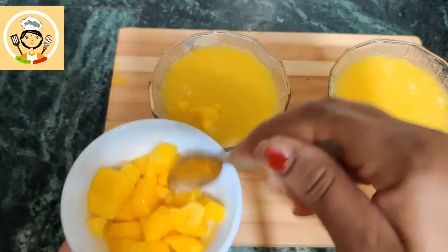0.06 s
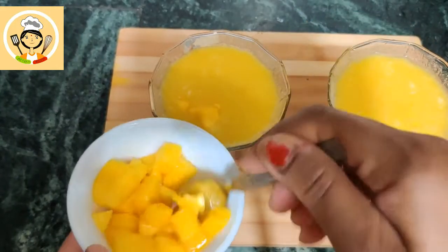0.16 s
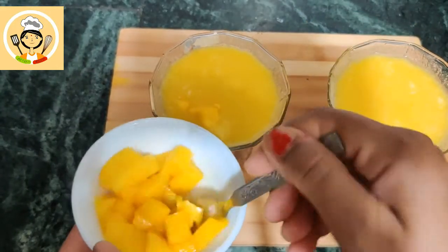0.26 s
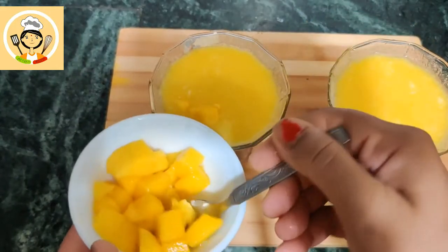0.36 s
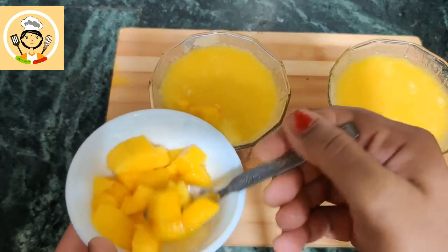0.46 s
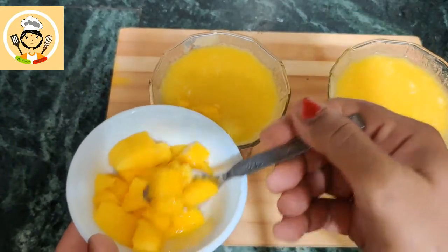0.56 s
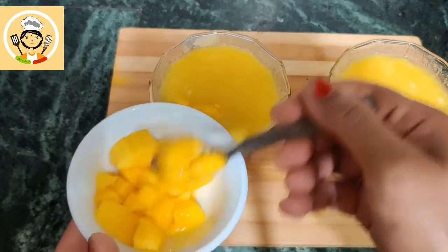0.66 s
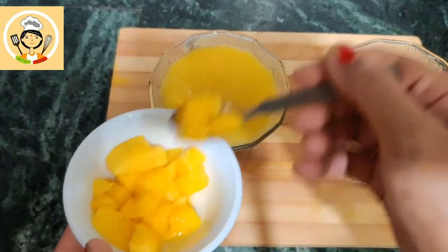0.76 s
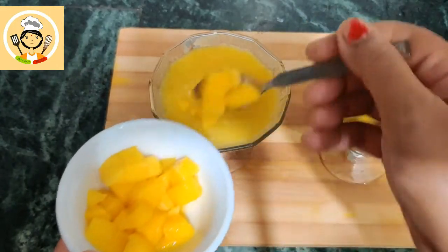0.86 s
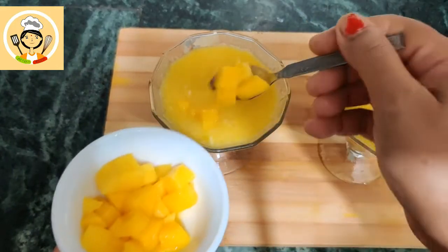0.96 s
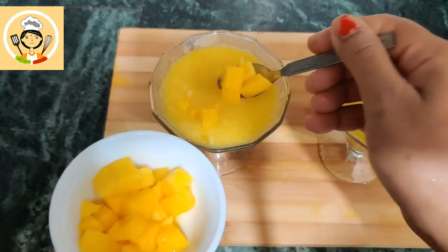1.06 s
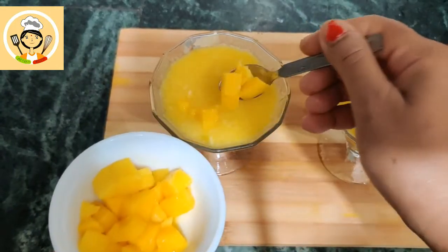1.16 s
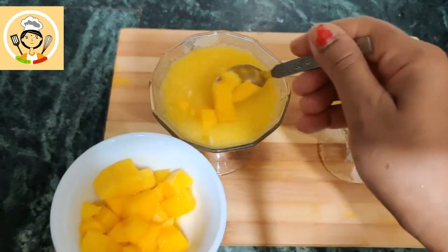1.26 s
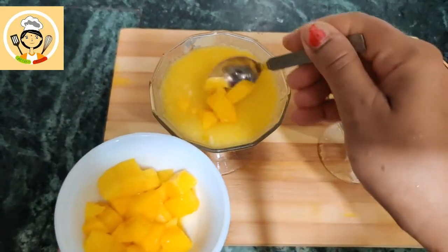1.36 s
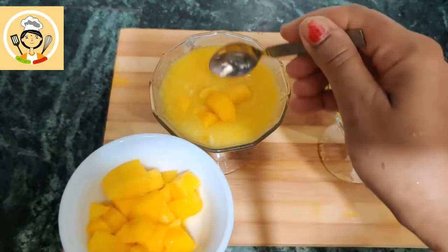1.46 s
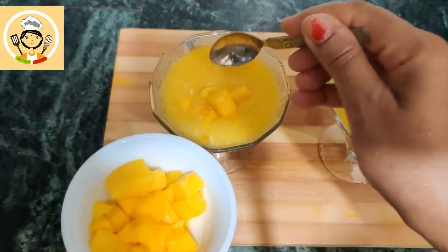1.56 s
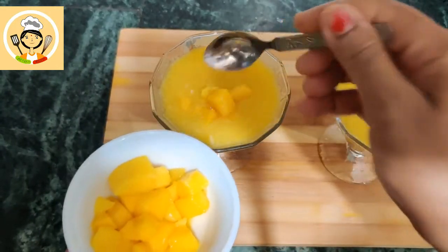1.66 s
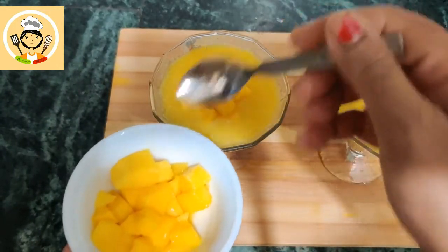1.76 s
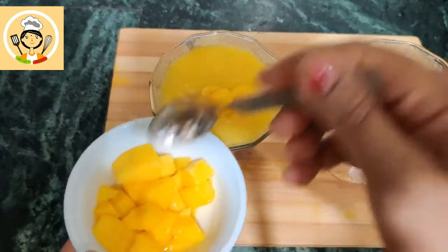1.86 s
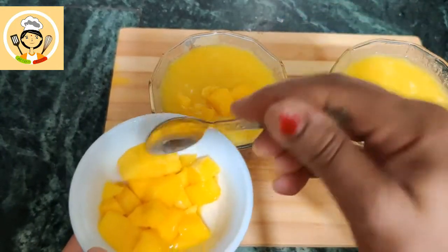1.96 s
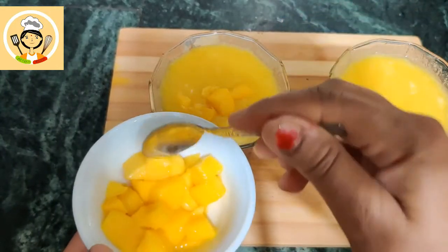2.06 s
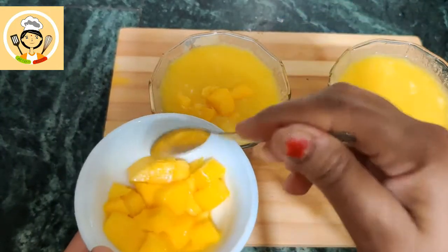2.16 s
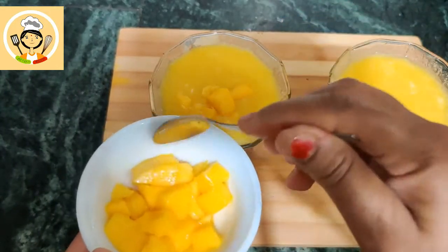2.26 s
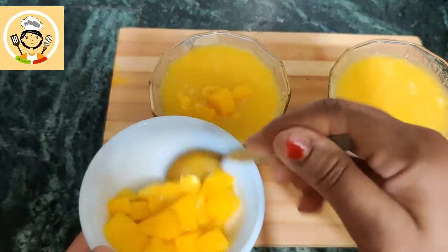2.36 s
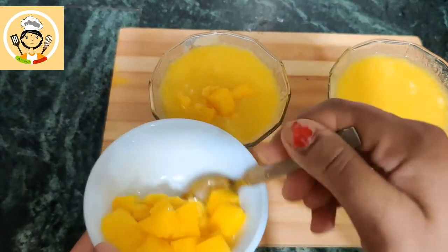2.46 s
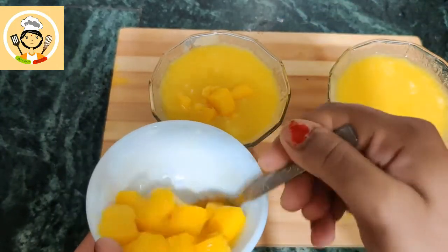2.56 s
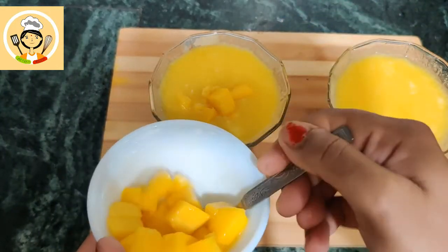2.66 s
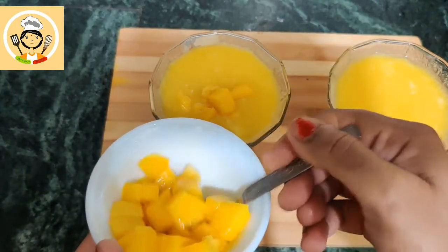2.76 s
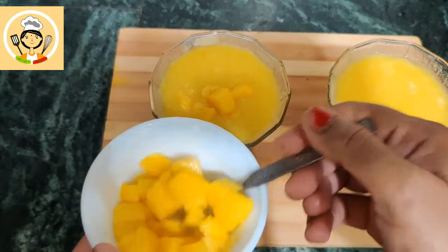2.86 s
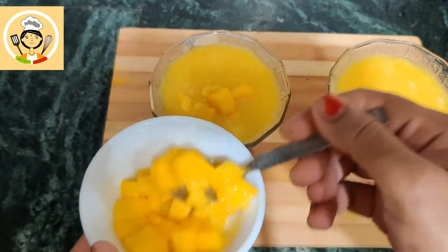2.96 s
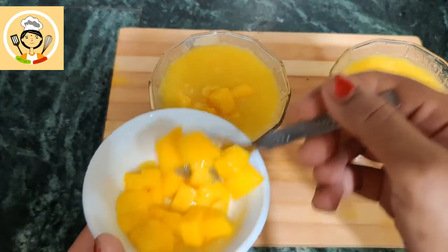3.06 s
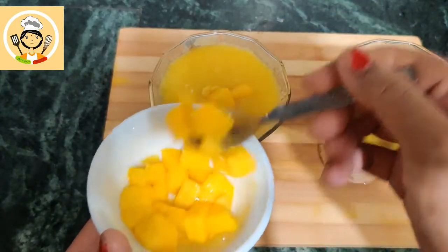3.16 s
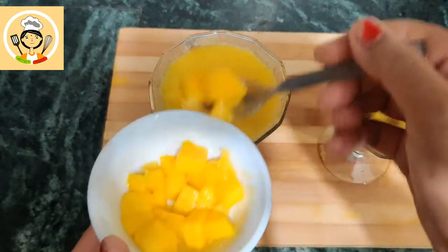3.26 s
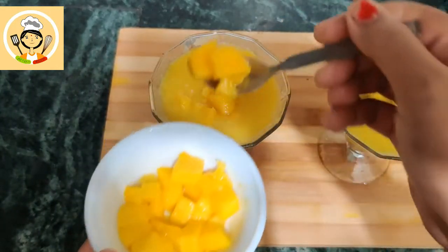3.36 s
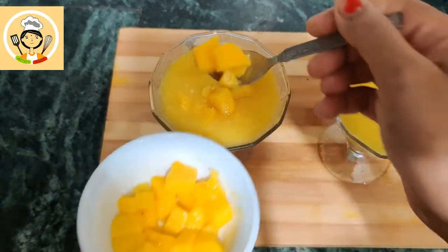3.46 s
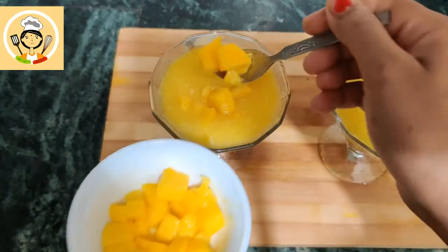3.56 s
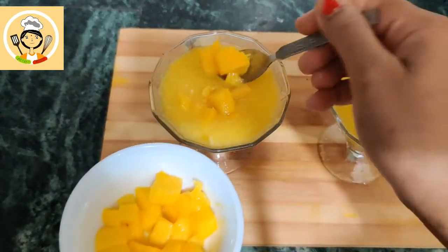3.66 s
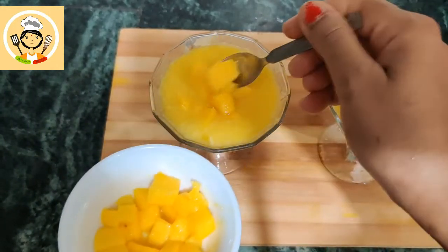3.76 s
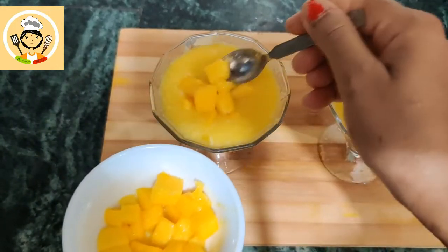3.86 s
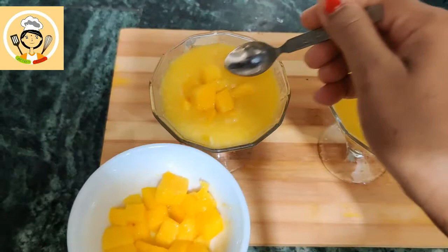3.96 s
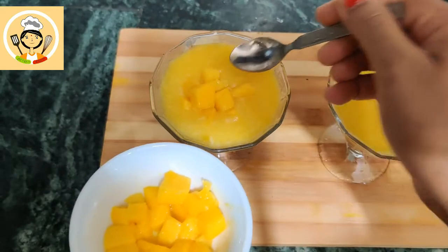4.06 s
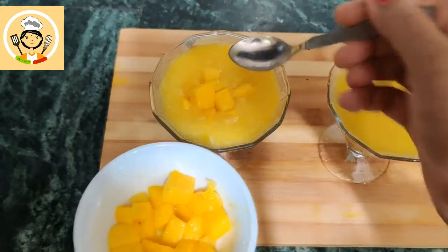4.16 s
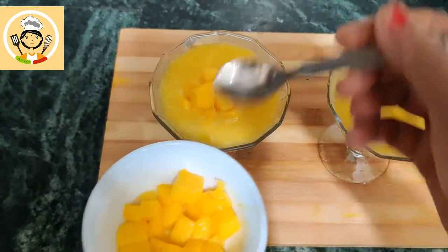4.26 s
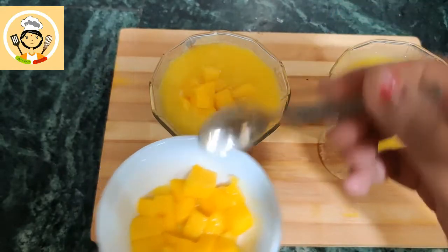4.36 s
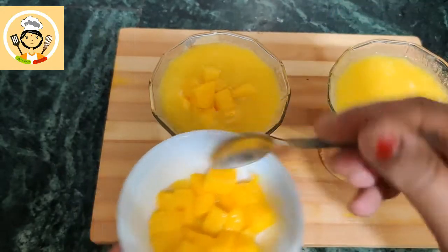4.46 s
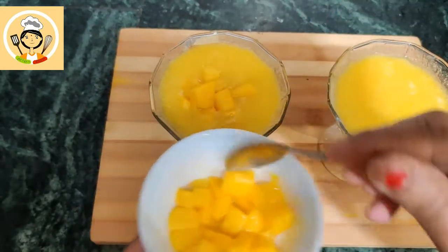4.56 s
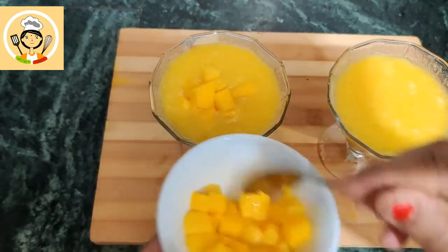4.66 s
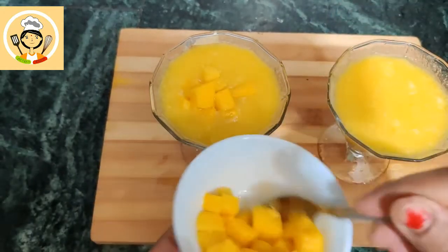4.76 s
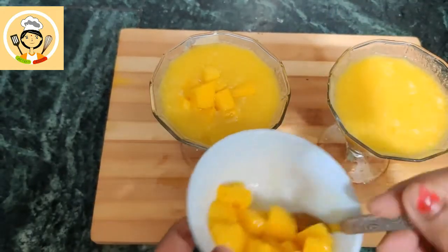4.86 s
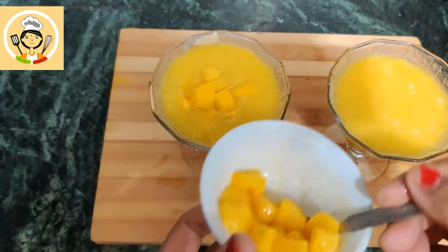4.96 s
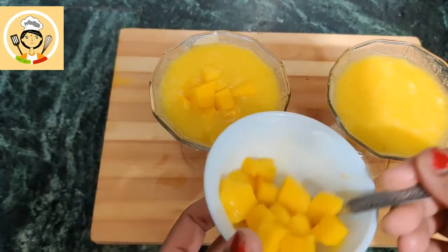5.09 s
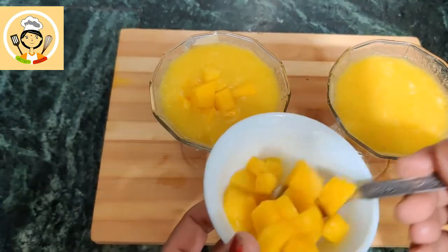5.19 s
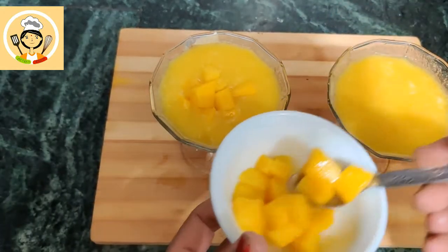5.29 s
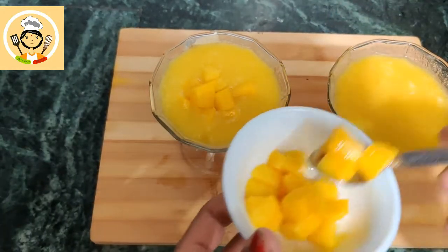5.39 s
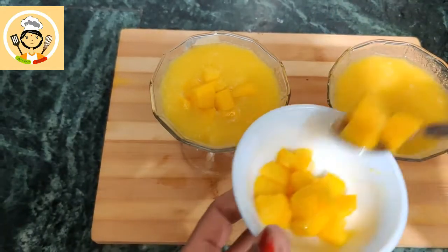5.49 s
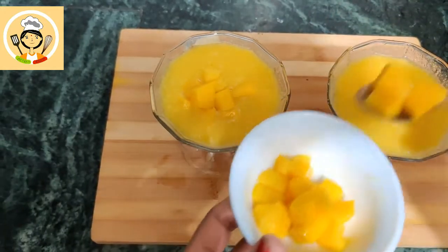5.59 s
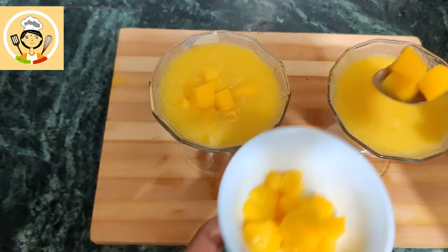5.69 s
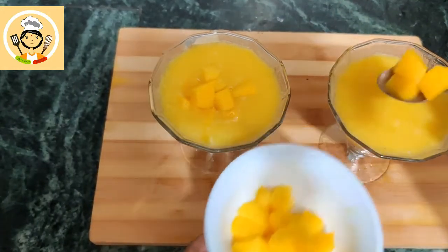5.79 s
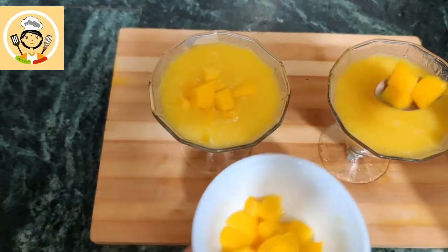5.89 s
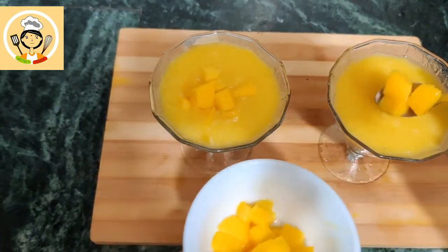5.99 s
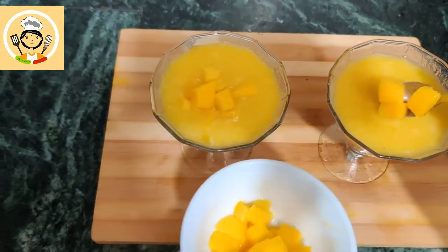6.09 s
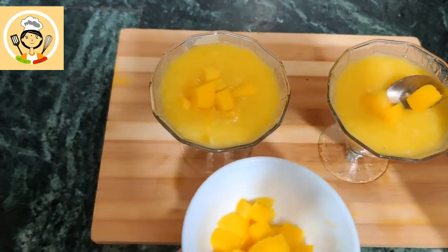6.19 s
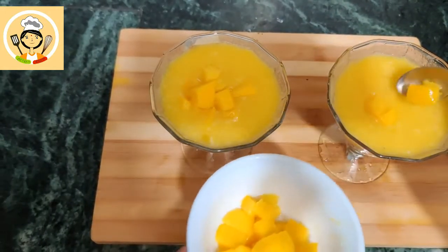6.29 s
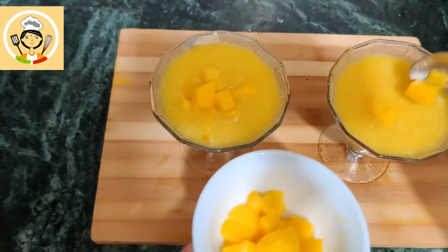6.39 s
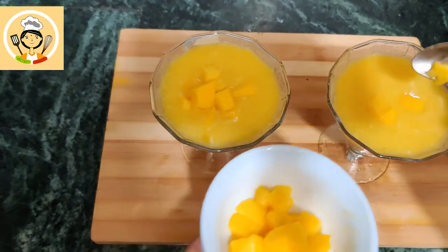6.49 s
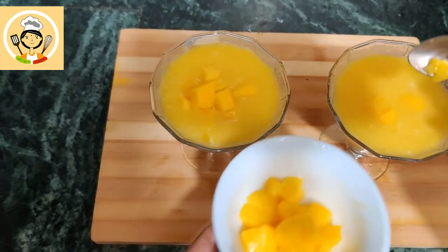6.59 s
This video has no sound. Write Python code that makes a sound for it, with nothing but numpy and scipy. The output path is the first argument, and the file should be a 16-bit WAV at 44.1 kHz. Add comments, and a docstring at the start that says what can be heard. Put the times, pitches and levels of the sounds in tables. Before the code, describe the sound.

A metal spoon clinks brightly against a ceramic bowl in scattered taps and short scrapes, over a faint low kitchen hum.

```python
"""A steel spoon scoops fruit from a hand-held ceramic bowl in a small kitchen, close to a phone.
Contacts are noise clicks plus decaying bowl and spoon modes; scrapes are rough gliding squeaks with grit.
The kitchen answers with shaped noise echoes.
Behind: wavering hum tones, filtered-noise rumble, air and hiss, and dull low handling bumps."""
import sys
import numpy as np
from scipy import signal
from scipy.fft import rfft, irfft, next_fast_len
from scipy.io import wavfile
from scipy.ndimage import map_coordinates

SR = 44100
rng = np.random.default_rng(int(sys.argv[2]) if len(sys.argv) > 2 else 0)


def to_wav(s):
    """Save 16-bit WAV."""
    ch = np.atleast_2d(s).T  # columns
    pcm = np.round(np.clip(ch, -1, 1) * 32767)  # PCM
    wavfile.write(sys.argv[1], SR, pcm.astype(np.int16))


N = 292383
BAND_LIMIT_HZ = 15900

# background course: start_s, relative_rumble_db, relative_air_db
BACKGROUND_COURSE = [(0.0, -45, -53), (0.5, -44.5, -53), (0.83, -49, -55), (1.0, -43, -54.5),
                     (1.72, -49.5, -55.5), (2.42, -44.5, -54), (4.23, -49.5, -58), (4.65, -47.5, -54.5),
                     (5.17, -48.5, -55), (5.35, -50, -56), (5.74, -45.5, -54), (6.63, -58.5, -58.5)]
# rumble spectrum: freq_hz, relative_density_db
RUMBLE_SPECTRUM = [(10, -13), (20, 1), (32, 2), (50, 1), (65, -2.5), (88, -3.5), (115, -21), (200, -17),
                   (400, -66)]
# air spectrum: freq_hz, relative_density_db
AIR_SPECTRUM = [(60, -12), (130, 0.5), (200, 3.5), (260, -1), (325, 8), (420, 0.5), (560, 1.5), (680, -3.5),
                (900, -0.5), (1500, -6), (3000, -11), (4200, -20.5), (9000, -28), (16000, -32)]
# port resonances in the hiss: freq_hz, width_hz, relative_level_db
HISS_RESONANCES = [(4950, 590, -3), (6570, 560, -13)]
# hum tones: pitch_hz, mean_level_db
HUM_TONES = [(29.5, -56.5), (47.5, -55.5), (99.8, -57), (131, -68.5), (179, -67.5), (199, -68.5),
             (317, -66.5), (356, -71), (424, -68.5), (509, -71.5), (570, -71.5), (876, -76)]
# left-right likeness of the background noise: freq_hz, correlation
STEREO_LIKENESS = [(30, 1), (100, .97), (250, 0.85), (500, 0.79), (750, 0.11), (1300, -0.14), (2200, 0.03),
                   (3300, -.1), (6000, -0.015)]
# dull handling bumps: centre_s, level_db, pitch_hz, half_width_s (to 1/e)
HANDLING_BUMPS = [(0.81, -47.5, 135.2, 0.15), (0.976, -49, 129, 0.21), (5.577, -52.5, 165, 0.11),
                  (5.767, -38, 38.9, 0.032), (5.915, -43, 45.2, 0.026)]
# kitchen tail decay: freq_hz, t60_s
KITCHEN_DECAY = [(300, 0.98), (2400, 0.33), (5200, 0.34), (9000, 0.3), (15000, 0.38)]
# click of steel on glaze: freq_hz, relative_density_db
CLICK_SPECTRUM = [(300, -29), (1000, -14), (1600, -11), (2200, 2), (3200, 10), (4200, -24.5), (4750, 9),
                  (5300, 2), (5900, -14), (7800, 0), (10500, -9), (13800, -10), (15500, -15)]
# treble balance of the two microphone ports: freq_hz, left_right_db
PORT_BALANCE = [(1500, -18), (3200, 0), (4700, 8.5), (5250, 3), (6100, -37), (7500, -10), (10000, 2),
                (14000, -3)]
# centres of the bowl's low, middle and high modes: freq_hz
MODE_CENTRES_HZ = [2400, 5200, 9100]
# bowl modes, ringing freely: freq_hz, relative_level_db, t60_s, left_right_db
BOWL_MODES = [(2366, -2.5, 1, 2.5), (3580, -17, 0.07, 17), (5227, -2, 0.08, 6), (5187, -9, .2, 13),
              (6600, -31, 0.062, -4), (7940, -5.5, 0.027, -11.5), (9150, -7, 0.079, -16.5),
              (8940, -5, 0.044, 9.5), (11600, -14.5, 0.038, 8), (13250, -31, 0.055, 4),
              (13620, -15, 0.11, -3), (14150, -23, .06, 1)]
# spoon edge sliding on glaze: start_s, length_s, start_level_db, first_squeak_hz, last_squeak_hz
EDGE_SLIDES = [(2.449, 0.16, -55.5, 5180, 5480), (2.992, 0.037, -50, 5460, 4820),
               (4.784, 0.043, -50, 5260, 5420), (4.841, .07, -58, 5540, 5150), (4.96, .05, -56, 4900, 4820)]
SLIDE_ATTACK_S, SLIDE_FADE_DB, SLIDE_FADE_EXPONENT = 0.003, 19, 1.1
# spoon through fruit to the bowl: start_s, strength_db, click_over_strength_db, knock_over_strength_db,
# knock_hz, clank_hz, extra_left_right_db
FRUIT_DIGS = [(0.414, -59, -7, -15, 3500, 6100, 0), (2.3675, -48, -23, -5, 2380, 5270, 0),
              (2.446, -35, -3, -2, 2240, 5150, 1.5), (2.4883, -46, 2, -9, 2480, 5150, 1),
              (2.5652, -50.5, 0, -15, 2720, 5700, -3), (2.7702, -55, 5, 7, 2750, 4670, 7),
              (2.816, -51, 2, 7, 2810, 4500, 6), (2.8996, -51, -5, -15, 2570, 4870, 1),
              (2.998, -40, -24, -25, 3320, 4660, 0), (2.9988, -43.5, -18, -21, 3400, 5840, 1),
              (4.77, -48, -4, -11, 3170, 5100, 0), (4.7792, -23.5, 0.5, -2.5, 2090, 4770, -1),
              (4.8648, -25.5, -6, -3.5, 2620, 5130, -1), (4.9388, -44, -17, -24, 2600, 4680, -9),
              (4.9598, -38.5, -16, -15, 2650, 4830, -8), (5.111, -60, 4, 17, 2200, 4860, 1)]
# ring of the fruit-muffled bowl in its low, middle and high modes: ring_over_strength_db
DIG_RING_OVER_DB = [-17.5, -4.5, -33]
DIG_FREE_S = 0.0015
# spoon on the bare bowl wall: start_s, ring_db, middle_modes_favoured_db, free_ringing_s,
# knock_db, knock_hz, clank_db, extra_left_right_db
WALL_CLINKS = [(0.0686, -27, 2.5, 0.039, -23.5, 3190, -22, 3),
               (0.234, -22.5, 4.5, 0.0082, -16.5, 2436, -25, -4),
               (0.238, -39, 3, .003, -16.5, 2400, -23, 12), (2.2982, -29, -3, 0.011, -25.5, 2360, -44, -1),
               (4.5377, -23.5, 1, 0.0076, -33, 2404, -27.5, 2.5),
               (4.5413, -24, 3.5, 0.0043, -31, 3380, -28, -6.5)]
CLINK_CLICK_DB, CLINK_CLANK_HZ = -26, 5086
HIGH_DB, HIGH_TRADE = -1.5, 0.6  # high modes against low; dB lost per dB the middle ones gain


def amp(db):
    """Gain of a level in dB."""
    return 10 ** (np.asarray(db) / 20)


def unit(x):
    """x scaled to rms 1."""
    return x / np.sqrt(np.mean(x ** 2) + 1e-20)


def along(points, hz):
    """Interpolate (freq_hz, value) points on a log frequency axis."""
    f, v = np.transpose(points)
    return np.interp(np.log(hz + 1), np.log(f + 1), v)


def sides(db):
    """Left and right gains for a level difference."""
    return amp(np.array([[0.5], [-0.5]]) * db)


def wobble(rate_hz):
    """Smooth random curve of rms 1, rate_hz knots a second."""
    knots = rng.standard_normal(int(N * rate_hz / SR) + 4)
    return unit(map_coordinates(knots, [np.arange(N) * rate_hz / SR]))


def filtered(x, response):
    """x times a response of frequency, zero-padded."""
    n = x.shape[-1]
    m = next_fast_len(n + 8192)
    spectrum = rfft(x, m) * response(np.fft.rfftfreq(m, 1 / SR))
    return irfft(spectrum, m)[..., :n]


def add(track, start_s, sound):
    """Mix a sound into the track, cut at its end."""
    part = track[:, round(start_s * SR):][:, :sound.shape[1]]
    part += sound[:, :part.shape[1]]


def rush(spectrum):
    """Stereo noise of rms 1, nearly mono in the bass: mid and side shares set the likeness."""
    def mid_side_response(hz):
        turn = np.arccos(np.clip(along(STEREO_LIKENESS, hz), -1, 1)) / 2
        return amp(along(spectrum, hz)) * [np.cos(turn), np.sin(turn)]

    mid, side = filtered(rng.standard_normal((2, N)), mid_side_response)
    return unit(np.array([mid + side, mid - side]))


def appliance_hum(waver_db=2):
    """Steady tones, each wavering slowly in level and phase."""
    t = np.arange(N) / SR
    hum = np.zeros(N)
    for hz, db in HUM_TONES:
        level = amp(db + waver_db * wobble(3.91)) * np.sqrt(2)
        hum += level * np.sin(2 * np.pi * hz * t + 0.81 * wobble(5))
    return hum


def port_hiss():
    """White noise through the port resonances, rms 1."""
    def resonances(f):
        return sum(amp(db) / (1 + (2 * (f - hz) / width_hz) ** 2) for hz, width_hz, db in HISS_RESONANCES)

    return unit(filtered(rng.standard_normal((2, N)), resonances))


def background(rumble_gain_db=0.94, air_gain_db=3.0, hiss_db=-73):
    """Low rumble and a rush of air; the hum and hiss follow the air's level."""
    t = np.arange(N) / SR
    start_s, *levels_db = np.transpose(BACKGROUND_COURSE)
    rumble_level, air_level = [amp(np.interp(t, start_s, db)) for db in levels_db]
    rumble = amp(rumble_gain_db) * rumble_level * rush(RUMBLE_SPECTRUM)
    air = amp(air_gain_db) * air_level * rush(AIR_SPECTRUM)
    return rumble + air + unit(air_level) * (appliance_hum() + amp(hiss_db) * port_hiss())


def bumps():
    """Soft low swells as the bowl and hands move: Gaussian bursts of a phase-wobbled tone."""
    t = np.arange(N) / SR
    out = np.zeros(N)
    for centre_s, db, hz, half_width_s in HANDLING_BUMPS:
        swell = amp(db) * np.exp(-((t - centre_s) / half_width_s) ** 2)
        out += swell * np.sin(2 * np.pi * hz * t + 1.2 * wobble(25))
    return out


def kitchen(x, early_db=-12, early_t60_s=0.088, tail_db=-11, gap_s=0.01, tail_rise_s=0.0017):
    """The worktop gives early noise echoes, the hard walls a short diffuse tail."""
    hz, t, z = signal.stft(rng.standard_normal((2, SR // 2)), SR, nperseg=256)
    decay = amp(-60 * t / along(KITCHEN_DECAY, hz)[:, None])
    tail = signal.istft(z * decay, SR, nperseg=256)[1]
    t = np.arange(tail.shape[1]) / SR
    early = rng.standard_normal(tail.shape) * amp(-60 * t / early_t60_s) * (t > gap_s)
    tail = tail * (1 - np.exp(-t / tail_rise_s))
    # norm of the left channel sets both gains
    answer = amp(early_db) * early / np.linalg.norm(early[0])
    answer += amp(tail_db) * tail / np.linalg.norm(tail[0])
    return signal.fftconvolve(x, answer, axes=1)[:, :N]


def contact_noise(size):
    """Noise in the colour of steel on glaze, as each port hears it."""
    def response(hz):
        return amp(along(CLICK_SPECTRUM, hz)) * sides(along(PORT_BALANCE, hz))

    return unit(filtered(rng.standard_normal((2, size)), response))


def scrapes(width_hz=600, rough_db=4, grit_db=-10, squeak_left_right_db=6):
    """The edge sticks and slips: a rough gliding squeak with grit, fading as the pressure eases."""
    out, t = np.zeros((2, N)), np.arange(N) / SR
    for start_s, length_s, db, first_hz, last_hz in EDGE_SLIDES:
        done = np.clip((t - start_s) / length_s, 0, 1)
        bite = np.clip((t - start_s) / SLIDE_ATTACK_S, 0, 1)
        pressure = bite * amp(db - SLIDE_FADE_DB * done ** SLIDE_FADE_EXPONENT) * (done < 1)
        phase = 2 * np.pi * np.cumsum(first_hz + (last_hz - first_hz) * done) / SR
        squeak = unit(wobble(width_hz) * np.cos(phase) + wobble(width_hz) * np.sin(phase))
        slips = unit(amp(rough_db * wobble(350)))
        grit = amp(grit_db) * contact_noise(N)
        out += pressure * slips * (sides(squeak_left_right_db) * squeak + grit)
    return out


def ring(t, hz, t60_s, attack_s, left_right_db, width_hz, lag_s=0.00006):
    """One fading mode, widened by contact chatter; it reaches the left port slightly earlier."""
    chatter = np.cumsum(rng.standard_normal(len(t))) * np.sqrt(2 * np.pi * width_hz / SR)
    phase = 2 * np.pi * hz * (t + lag_s * np.array([[0.5], [-0.5]])) + chatter
    envelope = amp(-60 * t / t60_s) * (1 - np.exp(-t / attack_s))
    return sides(left_right_db) * envelope * np.sin(phase)


def contact(ring_db, free_s, click_db, knock_db, knock_hz, clank_db, clank_hz, click_t60_s=0.014,
            attack_s=0.0007, spread_db=1, damped_t60_s=0.067, width_ratio=0.0012):
    """Steel touches the bowl: a click, then modes ring freely until the spoon settles and damps them."""
    t = np.arange(SR // 3) / SR
    sound = amp(click_db - 60 * t / click_t60_s) * contact_noise(len(t))
    damping = amp(-60 * np.maximum(t - free_s, 0) / damped_t60_s)
    for hz, db, t60_s, left_right_db in BOWL_MODES:
        strike_db = np.interp(hz, MODE_CENTRES_HZ, ring_db) + rng.normal(0, spread_db)
        mode = ring(t, hz, t60_s, attack_s, left_right_db, width_ratio * hz)
        sound += amp(db + strike_db) * damping * mode
    # damped modes of the gripped spoon; pitch depends on how it presses
    knock = ring(t, knock_hz, t60_s=0.031, attack_s=0.0031, left_right_db=6.5, width_hz=52)
    clank = ring(t, clank_hz, t60_s=0.018, attack_s=0.00057, left_right_db=18.0, width_hz=77)
    return sound + amp(knock_db) * knock + amp(clank_db) * clank


def digs():
    """Muffled touches: strength sets clank and short ring; how squarely it lands, click and knock."""
    out = np.zeros((2, N))
    for start_s, db, click_db, knock_db, knock_hz, clank_hz, left_right_db in FRUIT_DIGS:
        touch = contact(db + np.array(DIG_RING_OVER_DB), DIG_FREE_S, db + click_db,
                        db + knock_db, knock_hz, db, clank_hz)
        add(out, start_s, sides(left_right_db) * touch)
    return out


def clinks():
    """Open strikes: where the spoon lands trades the bowl's middle modes against its high ones."""
    out = np.zeros((2, N))
    for start_s, db, middle_db, free_s, knock_db, knock_hz, clank_db, left_right_db in WALL_CLINKS:
        ring_db = [db, db + middle_db, db + HIGH_DB - HIGH_TRADE * middle_db]
        strike = contact(ring_db, free_s, CLINK_CLICK_DB, knock_db, knock_hz, clank_db, CLINK_CLANK_HZ)
        add(out, start_s, sides(left_right_db) * strike)
    return out


def scene():
    """Spoon and bowl in the kitchen, over handling bumps and the background."""
    spoon = clinks() + digs() + scrapes()
    return spoon + kitchen(spoon) + bumps() + background()


def record(dry):
    """The phone cuts steeply above its band limit."""
    return filtered(dry, lambda hz: 1 / (1 + (hz / BAND_LIMIT_HZ) ** 120))


dry = scene()
out = record(dry)
to_wav(out)
```